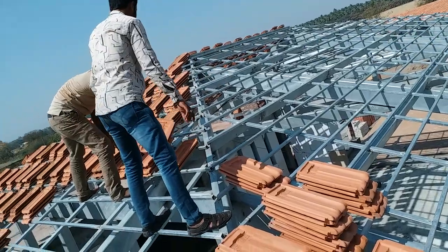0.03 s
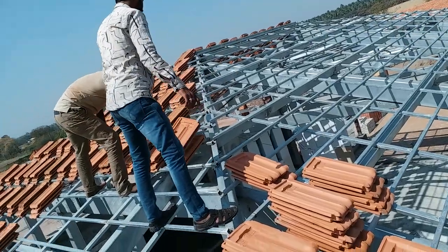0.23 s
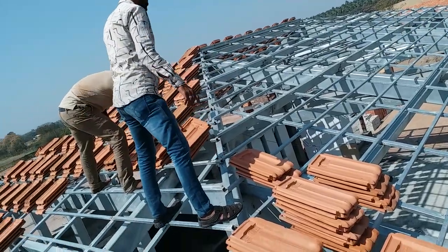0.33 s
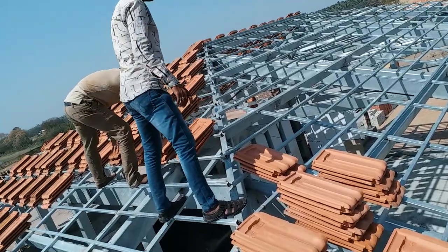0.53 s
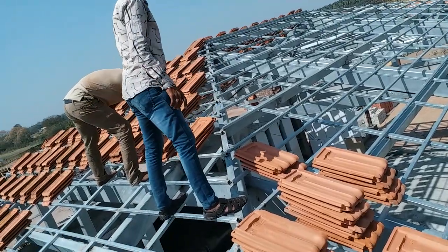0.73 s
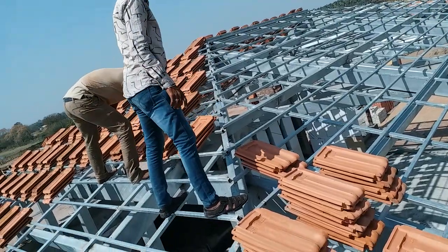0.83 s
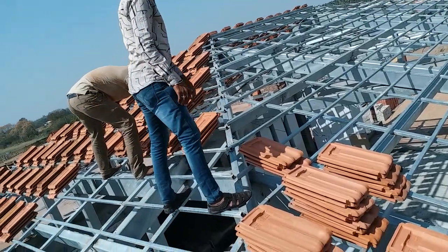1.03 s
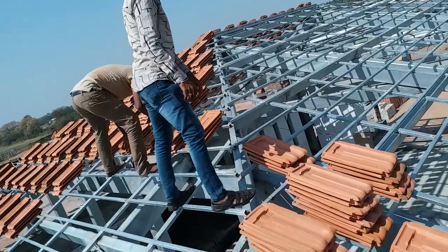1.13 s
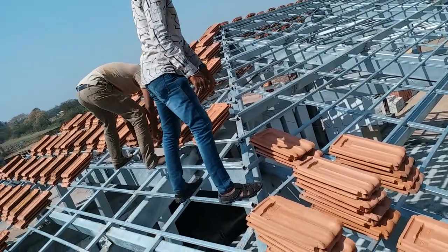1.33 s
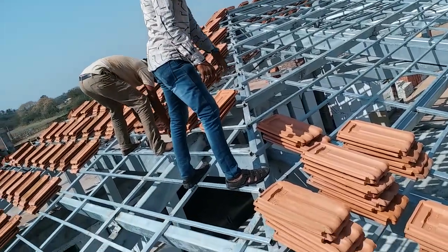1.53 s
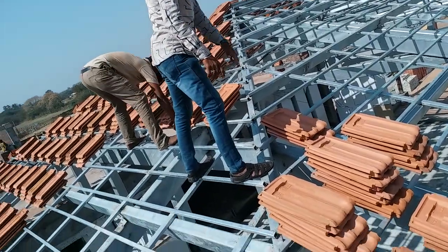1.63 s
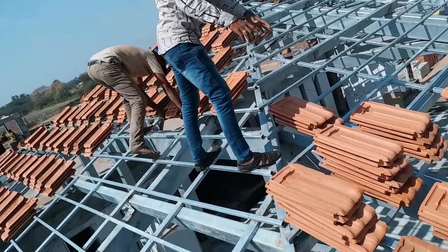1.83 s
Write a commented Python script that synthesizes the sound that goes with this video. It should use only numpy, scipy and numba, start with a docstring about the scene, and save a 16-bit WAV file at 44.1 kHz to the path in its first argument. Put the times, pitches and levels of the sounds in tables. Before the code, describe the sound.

A clay tile rattles on a steel frame, then another clacks onto tiles outdoors.

```python
"""Clay tiles on a steel roof frame

Outdoors, a few metres from a phone, a tile lands and rattles on the battens, exciting their modes.
A second tile clacks onto its neighbours, the building echoes and feet thud softly. A distant engine
drones in harmonics under a hiss, with three faint hoots. The phone's gain control ducks loud sound."""
import sys
import numpy as np
from scipy import signal
from scipy.fft import rfft, irfft
from scipy.io import wavfile
from scipy.ndimage import uniform_filter1d
from numba import njit

SR = 44100
rng = np.random.default_rng(int(sys.argv[2]) if len(sys.argv) > 2 else 0)


def pcm_store(signal):
    """Save signal as 16-bit PCM."""
    levels = np.round(np.clip(np.atleast_2d(signal), -1, 1) * 32767)
    wavfile.write(sys.argv[1], SR, levels.astype(np.int16).T)


N = 83790

# impacts of tile on steel: start_s, level_db, brightness_hz, best_struck_hz
FRAME_IMPACTS = [(.3287, -4, 1900, 960), (.336, -1, 2500, 1010), (.345, -3.5, 2930, 1000),
                 (.356, -1.5, 3160, 950), (.3734, -0.5, 2000, 1490), (.3905, -1.5, 14000, 1480),
                 (.4044, -2, 4260, 1570), (.413, -4.5, 3750, 2570), (.422, -7, 2780, 1230)]
# modes of the frame: pitch_hz, level_db, t60_s, left_minus_right_db
FRAME_MODES = [(384, -7.5, 0.088, -1.5), (465.7, -11, 0.19, 0), (551, -24, 0.7, 2), (595, -27, 0.86, -7),
               (880, -17, 0.63, 8), (954, -1, 0.15, 4), (1020, 0, 0.1, 8), (1055, -3.5, 0.067, -1),
               (1214, -7.5, 0.26, 0), (1320, -8, 0.28, -1), (1461, -0.5, 0.12, -5), (1506, 3, 0.076, 2),
               (1594, -6.5, .14, 4), (2100, -11, 0.18, 12), (2308, -1, 0.079, 11.5), (2550, -5.5, 0.13, 8),
               (4479, -10, .12, 11)]
# dense ring of the frame between its modes: frequency_hz, density_db
FRAME_BODY = [(100, -28), (250, -16.5), (420, -16), (650, 0.5), (800, -12), (950, -3.5), (1600, 0),
              (1900, 0), (2600, -6), (3100, -4), (4500, -5.5), (6500, -14.5), (8000, -24), (15000, -27)]
# impacts of tile on tile: start_s, level_db, brightness_hz, best_struck_hz
TILE_IMPACTS = [(.737, -3.5, 2010, 1800), (.745, -3, 7000, 560), (.7525, -4.5, 4450, 560),
                (.76, -2, 6000, 1840), (.768, -9.5, 6450, 2540), (.777, -7.5, 3020, 900),
                (.795, -4, 1000, 700)]
# modes of a tile: pitch_hz, level_db, t60_s, left_minus_right_db
TILE_MODES = [(566, -14, 0.11, 0), (581, -1.5, 0.092, 3), (895, -2, 0.081, 2), (1173, -3.5, 0.11, 1),
              (1785, 5, 0.067, 7.5), (1834, -6, 0.13, 7.5), (2153, -9.5, 0.046, 24), (2510, -1, 0.064, -2),
              (3774, -4, .08, 5)]
# gritty ring of the clay: frequency_hz, density_db
TILE_BODY = [(100, -27), (280, -28), (520, 2), (780, -6.5), (1800, 9.5), (3000, 0.5), (4000, 0.5),
             (6400, -2), (8000, -6.5), (15000, -15)]
# clay grit scraping under the tile: start_s, level_db, rise_s, centre_hz
SCRAPES = [(0.355, -26, .012, 3830), (0.394, -16.5, 0.0043, 5400)]
# modes of a tile's edge: pitch_hz, level_db
EDGE_MODES = [(2610, -20), (3170, -26), (3480, -26)]
# echo of the building below: frequency_hz, density_db
ECHO_SPECTRUM = [(100, -12), (560, 4), (900, -1), (2000, -0.5), (6000, 5), (15000, -18)]
# footfalls on the frame: start_s, level_db, pitch_hz
FOOTFALLS = [(0.737, -41, 72), (.86, -43, 72), (0.865, -40, 131), (1.346, -44, 82), (1.73, -47, 72)]
# engine speed: time_s, cycle_rate_hz
ENGINE_SPEED = [(0, 46.4), (.09, 46.1), (.33, 45.8), (.85, 45.55), (1.6, 45.78), (1.9, 45.65)]
# engine harmonics, from the third upwards: level_db
ENGINE_ORDERS = [-15, -14, -10, -14, -8, -4, -3, 0, -5, -4, -14, -1, -8, -8, -12, -13, -12, -6, -12, -5, -3,
                 -6, -8, -2, -2, -5, -7, -3, -15, -15, -11, -16, -10]
# far hoots: peak_s, level_db, pitch_hz
HOOTS = [(1.535, -34.5, 416.6), (1.643, -30.5, 392), (1.725, -33.5, 387.6)]
# outdoor hiss and low rumble: frequency_hz, density_db
AIR_SPECTRUM = [(30, -30), (70, -16), (130, -10), (250, -9), (400, -1), (620, -2), (800, -6.5), (1250, 0.5),
                (1550, 0.5), (1850, -2.5), (2500, -1), (3700, -2), (5200, -5.5), (6400, -1.5),
                (7400, -13.5), (10300, -15.5), (12500, -26.5), (15500, -26.5)]
# background gains: time_s, low_drone_db, upper_drone_db, rush_db, hiss_db
BACKGROUND_GAINS = [(0, -37, -36.5, -29.5, -31), (.2, -34, -34, -25, -26), (.33, -32, -30, -24.5, -25.5),
                    (.55, -33.5, -37, -26, -29.5), (.85, -37, -36, -32, -32.5),
                    (1.07, -37, -36, -33.5, -33), (1.42, -38.5, -37.5, -34, -34),
                    (1.68, -35.5, -32.5, -34.5, -31.5), (1.9, -33, -32, -31.5, -30)]
# balance of diffuse sound at the microphone ports: frequency_hz, left_minus_right_db
DIFFUSE_BALANCE = [(200, 6), (750, -5), (1200, -2), (2100, 1), (3500, 6.5), (6400, 7), (8200, 0),
                   (15000, 3)]

TOP_HZ = 15900  # upper band limit
TIME_S, BINS_HZ = np.arange(N) / SR, np.arange(N // 2 + 1) * SR / N


def frame_rattle():
    """A rebounding tile drives the lightly damped modes of the steel again and again."""
    return impacts(FRAME_IMPACTS, FRAME_MODES, FRAME_BODY, modes_db=-12, body_db=-11, crack_db=-16.5,
                   body_t60_s=.29, treble_damp=.32, right_lag_s=.00008, rise_s=.0018)


def tile_clack():
    """Clay is more heavily damped than steel, so tile on tile rings only briefly."""
    return impacts(TILE_IMPACTS, TILE_MODES, TILE_BODY, modes_db=-18.5, body_db=-15.5, crack_db=-18,
                   body_t60_s=.097, treble_damp=.16, right_lag_s=-.00031, rise_s=.00021)


def impacts(contacts, modes, body, modes_db, body_db, crack_db, body_t60_s, treble_damp, right_lag_s,
            rise_s, crack_s=.0021, struck_db=4, struck_octaves=.12, detune=.0041):
    """Modal superposition: each contact cracks, then rings; where it lands favours certain modes."""
    out, n = np.zeros((2, N)), SR // 2
    t = TIME_S[:n]
    hz, mode_db, t60_s, pan_db = np.array(modes, float).T
    ports = sides(pan_db) * np.exp(-2j * np.pi * hz * np.array([[0], [right_lag_s]]))
    envelopes = decay(t, t60_s[:, None])
    for start_s, db, brightness_hz, struck_hz in contacts:
        favoured = np.exp(-(np.log2(hz / struck_hz) / struck_octaves) ** 2)
        weights = ports * undb(mode_db + struck_db * favoured)
        pitch_hz = hz * (1 + detune * rng.standard_normal(len(hz)))
        phase = 2 * np.pi * (pitch_hz[:, None] * t + rng.random((len(hz), 1)))
        modal = weights.real @ (envelopes * np.sin(phase)) + weights.imag @ (envelopes * np.cos(phase))
        dense = damp(diffuse(body)[:, :n], body_t60_s, treble_damp)
        ring = (undb(modes_db) * modal + undb(body_db) * dense) * (1 - np.exp(-t / rise_s))
        crack = undb(crack_db) * cut(rng.standard_normal((2, n)), 660, "high") * np.exp(-t / crack_s)
        i = int(start_s * SR)
        # each contact has its own brightness, from dull knock to sharp crack
        out[:, i:i + n] += undb(db) * cut(ring + crack, brightness_hz, "low")
    return cut(out, 220, "high")  # bass radiates poorly


def scrapes(grain_spread_db=7):
    """Friction: the tile's edge drags on the steel in short bursts of uneven grains."""
    out = np.zeros((2, N))
    for start_s, db, rise_s, hz in SCRAPES:
        age = since(start_s) / rise_s
        grains = rng.standard_normal((2, N)) * undb(grain_spread_db * rng.standard_normal(N))
        grit = cut(cut(cut(grains, hz, "high"), hz, "low"), hz, "low")
        out += undb(db) * grit / grit.std() * age * np.exp(1 - age)
    return out


def edge_clink(start_s=.709, rise_s=.0052, t60_s=.065, pan_db=11):
    """Free vibration: a tile's edge touches lightly and rings just before it is set down."""
    t = since(start_s)
    ring = sum(undb(db) * np.sin(2 * np.pi * hz * t) for hz, db in EDGE_MODES)
    return sides(pan_db) * ring * (1 - np.exp(-t / rise_s)) * decay(t, t60_s)


def building_echo(x, gain_db=-14.5, t60_s=.63, delay_s=.0067):
    """Reverberation: convolution with the diffuse response of the rooms under the open roof."""
    onset = np.clip(TIME_S / delay_s - 1, 0, 1)
    tail = diffuse(ECHO_SPECTRUM) * decay(TIME_S, t60_s) * onset
    tail /= np.sqrt(np.sum(tail ** 2) / 2)
    return undb(gain_db) * signal.fftconvolve(x.mean(axis=0)[None], tail, axes=1)[:, :N]


def footfalls(rise_s=.0084):
    """Damped oscillation: each soft step gives a low thud of a few cycles."""
    out = np.zeros(N)
    for start_s, db, hz in FOOTFALLS:
        t = since(start_s)
        out += undb(db) * t / rise_s * np.exp(1 - t / rise_s) * np.sin(2 * np.pi * hz * t)
    return out


def engine(flutter_db=1.13, upper_from_hz=820, upper_pan_db=6, right_lag_s=.00023, scatter_rad=.97):
    """Periodic firing makes a harmonic series, smeared and fluttering on its way through the air."""
    cycle_hz = over_time(ENGINE_SPEED)
    cycle_phase = 2 * np.pi * np.cumsum(cycle_hz) / SR
    low, upper = np.zeros((2, N)), np.zeros((2, N))
    for order, db in enumerate(ENGINE_ORDERS, 3):
        smear, scatter = rng.standard_normal(2)
        hz = order * cycle_hz.mean()
        phase = order * cycle_phase + 2 * np.pi * smear
        amplitude = undb(db + flutter_db * wander(rate_hz=7.41))
        if hz < upper_from_hz:
            low += amplitude * np.cos(phase)
        else:
            port_phase = 2 * np.pi * hz * right_lag_s + scatter_rad * scatter
            upper += amplitude * np.cos(phase + np.array([[.5], [-.5]]) * port_phase)
    low *= undb(over_time(BACKGROUND_GAINS, column=1)) / low.std()
    upper *= undb(over_time(BACKGROUND_GAINS, column=2)) / upper.std()
    return low + upper * sides(upper_pan_db)


def hoots(sigma_s=.0092):
    """Gaussian tone pulses: three short, almost pure hoots, each lower than the last."""
    out = np.zeros(N)
    for peak_s, db, hz in HOOTS:
        envelope = np.exp(-.5 * ((TIME_S - peak_s) / sigma_s) ** 2)
        out += undb(db) * envelope * np.sin(2 * np.pi * hz * TIME_S)
    return out


def outdoor_air(crossover_hz=2000):
    """Broadband noise in two complementary bands: a low rush and a hiss, each swelling and sinking."""
    air = diffuse(AIR_SPECTRUM)
    rush = irfft(rfft(air) / (1 + (BINS_HZ / crossover_hz) ** 4), N)
    hiss = (air - rush) * undb(over_time(BACKGROUND_GAINS, column=4))
    return rush * undb(over_time(BACKGROUND_GAINS, column=3)) + hiss


def diffuse(spectrum, coherent_below_hz=445):
    """A diffuse field of rms 1: coherent at the two ports in the bass, independent in the treble."""
    mid, side = rfft(rng.standard_normal((2, N)))
    coherence = 1 / (1 + (BINS_HZ / coherent_below_hz) ** 4)
    pair = mid * np.sqrt(1 + coherence) + side * np.sqrt(1 - coherence) * np.array([[1], [-1]])
    noise = irfft(pair * undb(over_frequency(spectrum)) * sides(over_frequency(DIFFUSE_BALANCE)), N)
    return noise / np.sqrt(np.mean(noise ** 2))


def damp(x, t60_s, treble_damp):
    """Damping grows with frequency, so higher octaves die first; t60_s holds at 1 kHz."""
    n = x.shape[1]
    hz = np.arange(n // 2 + 1) * SR / n
    octave = np.clip(np.log2(hz / 1000 + 1e-9), -2, 4)
    spectrum, out = rfft(x), np.zeros_like(x)
    for k in range(-2, 5):
        band = irfft(spectrum * np.maximum(1 - abs(octave - k), 0), n)
        out += band * decay(TIME_S[:n], t60_s / 2 ** (k * treble_damp))
    return out


def decay(t, t60_s):
    """Exponential decay of 60 dB in t60_s."""
    return np.exp(-np.log(1000) * t / t60_s)


def since(start_s):
    """Seconds after an onset, zero before it."""
    return np.maximum(TIME_S - start_s, 0)


def undb(db):
    """Decibels to amplitude gain."""
    return 10 ** (np.asarray(db) / 20)


def sides(db):
    """Left and right gains for a level difference."""
    return undb(np.array([[.5], [-.5]]) * db)


def over_frequency(rows):
    """Interpolate a spectrum on a log-frequency axis."""
    hz, db = np.array(rows, float).T
    return np.interp(np.log(BINS_HZ + 1e-9), np.log(hz), db)


def over_time(rows, column=1):
    """Interpolate one column at every sample."""
    rows = np.array(rows, float)
    return np.interp(TIME_S, rows[:, 0], rows[:, column])


def cut(x, hz, kind):
    """Two-pole low-pass or high-pass."""
    return signal.lfilter(*signal.butter(2, min(hz, TOP_HZ), kind, fs=SR), x)


def wander(rate_hz):
    """Smoothed random steps with a standard deviation of 1."""
    hold = int(SR / rate_hz)
    steps = np.repeat(rng.standard_normal(256), hold)[:N]
    smooth = uniform_filter1d(uniform_filter1d(steps, hold), hold)
    return smooth / smooth.std()


@njit
def follow(x, attack_s, release_s):
    """One-pole envelope follower with separate rise and fall times."""
    out, level = np.empty(len(x)), 0.
    for i in range(len(x)):
        level += (x[i] - level) / (SR * (attack_s if x[i] > level else release_s))
        out[i] = level
    return out


def scene():
    """Linear superposition of the contacts, their echo and the background."""
    contacts = frame_rattle() + tile_clack() + scrapes() + edge_clink()
    return contacts + building_echo(contacts) + footfalls() + engine() + hoots() + outdoor_air()


def record(dry):
    """Compression: the phone ducks loud sound, cuts deep bass, clips at full scale and cuts the top."""
    threshold_db, ratio = -6, 3
    envelope = follow(abs(dry).max(axis=0), attack_s=.001, release_s=.035)
    ducked = dry * np.maximum(envelope / undb(threshold_db), 1) ** (1 / ratio - 1)
    clipped = np.clip(cut(ducked, 48, "high"), -1, 1)
    return signal.sosfilt(signal.ellip(10, .1, 80, TOP_HZ, fs=SR, output="sos"), clipped)


dry = scene()
out = record(dry)
pcm_store(out)
```